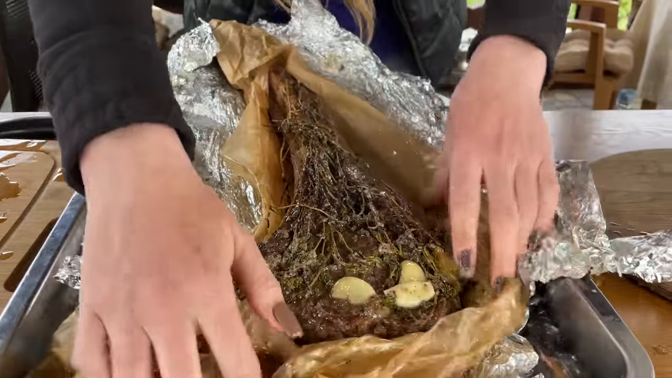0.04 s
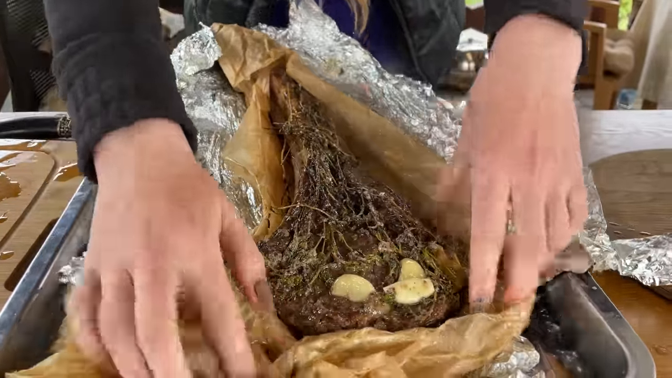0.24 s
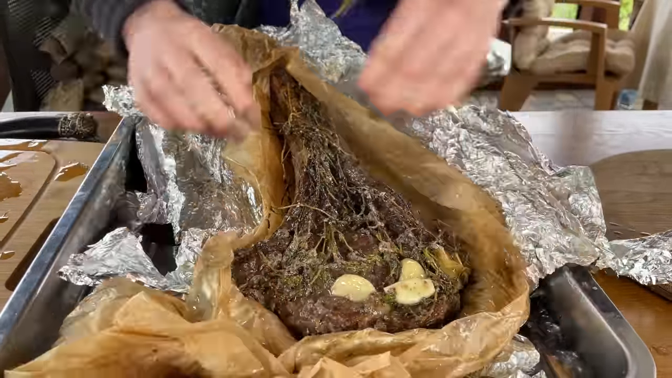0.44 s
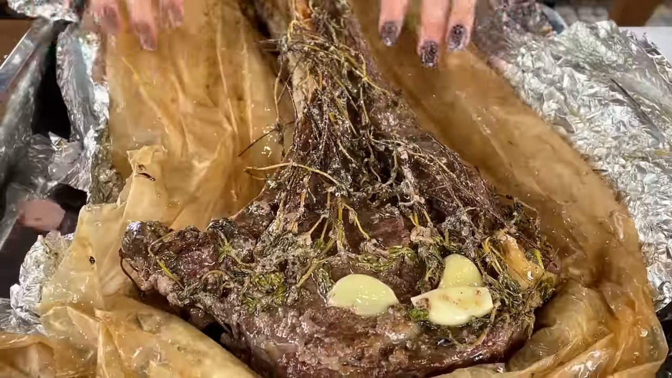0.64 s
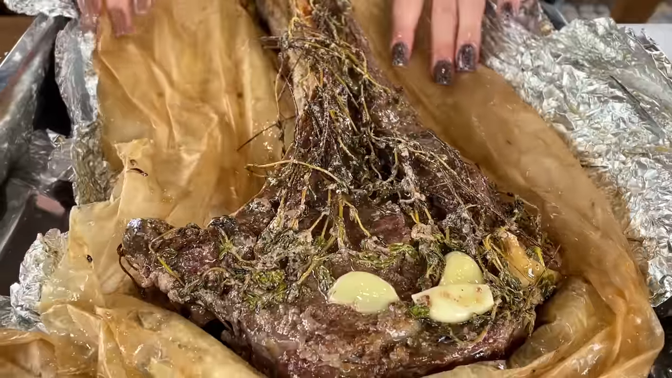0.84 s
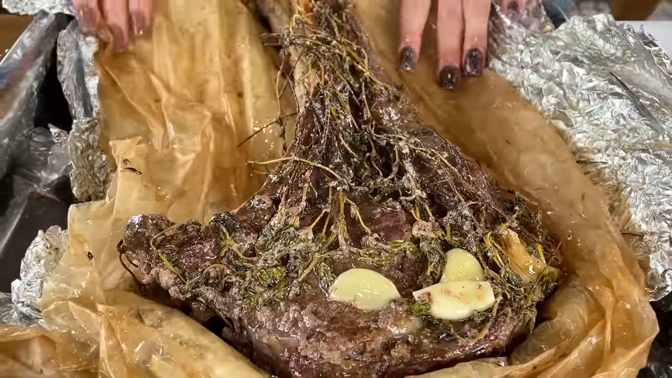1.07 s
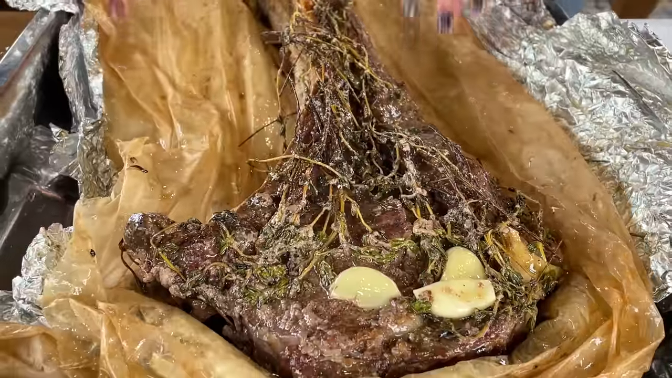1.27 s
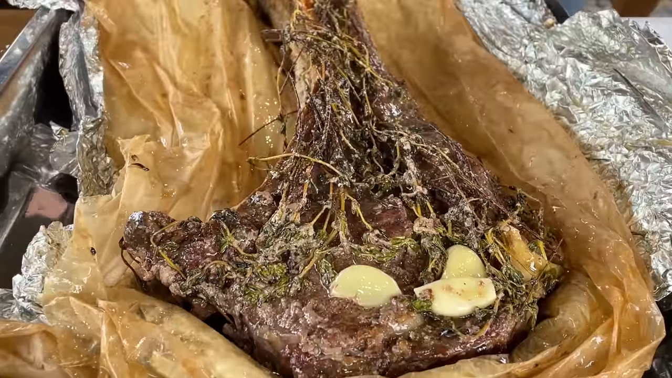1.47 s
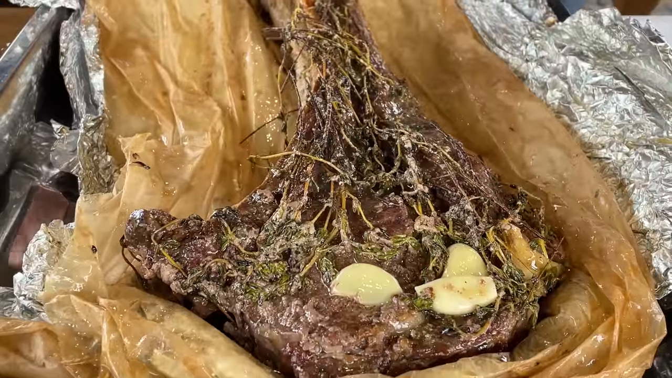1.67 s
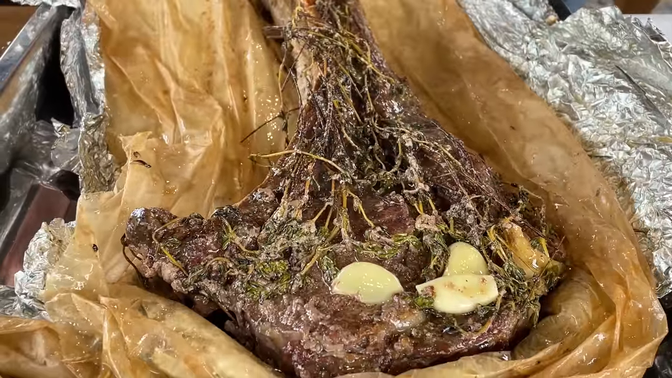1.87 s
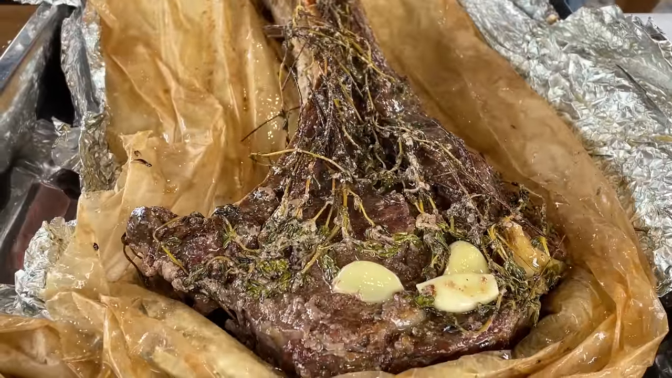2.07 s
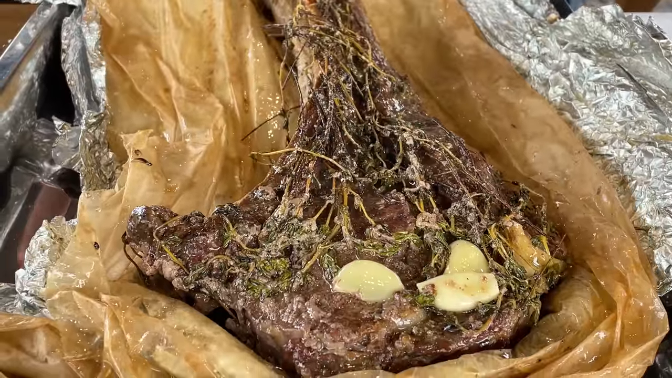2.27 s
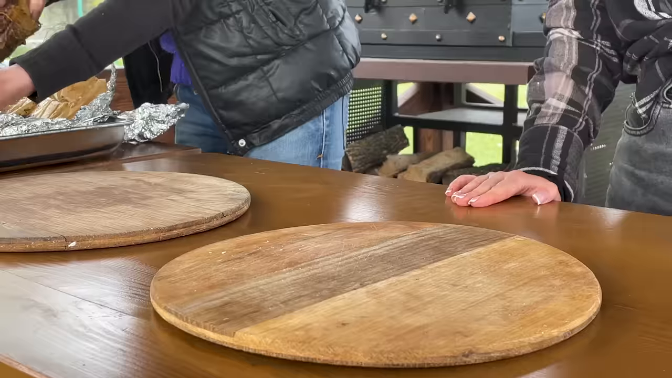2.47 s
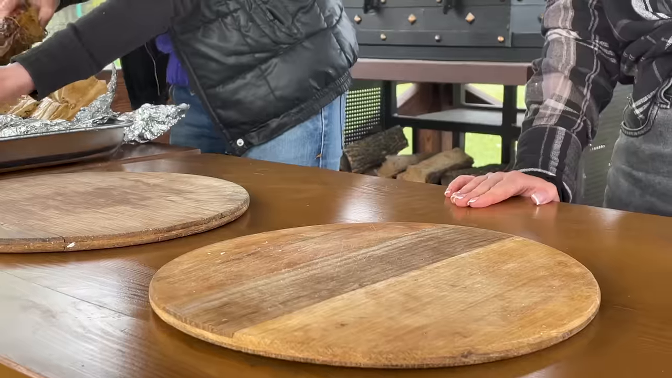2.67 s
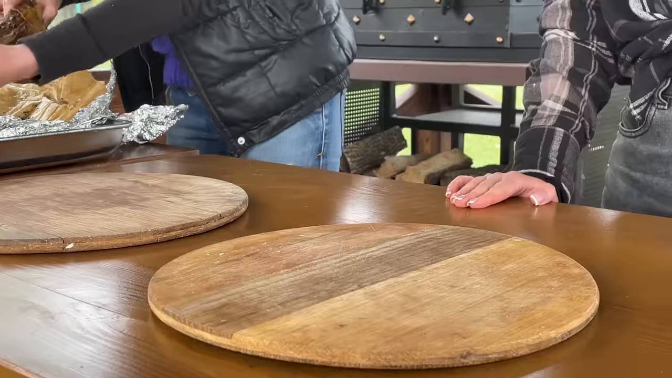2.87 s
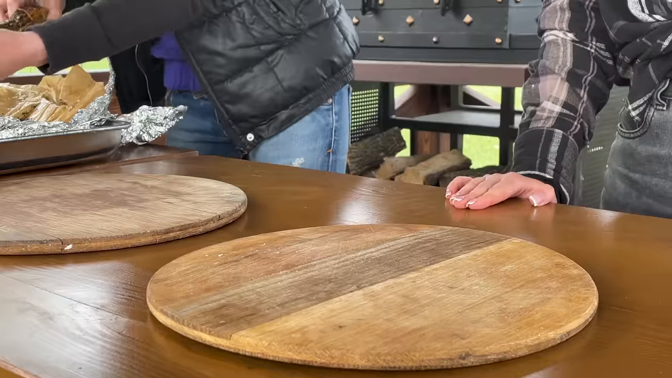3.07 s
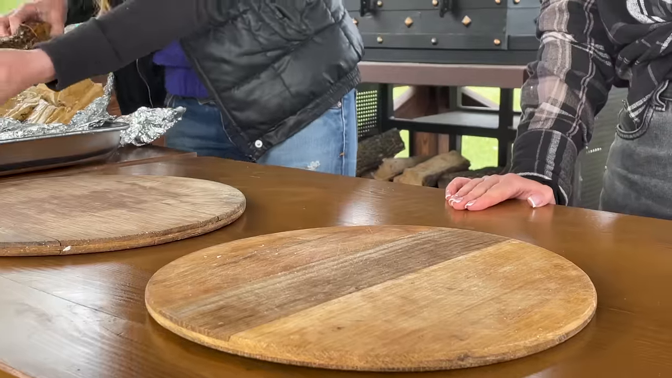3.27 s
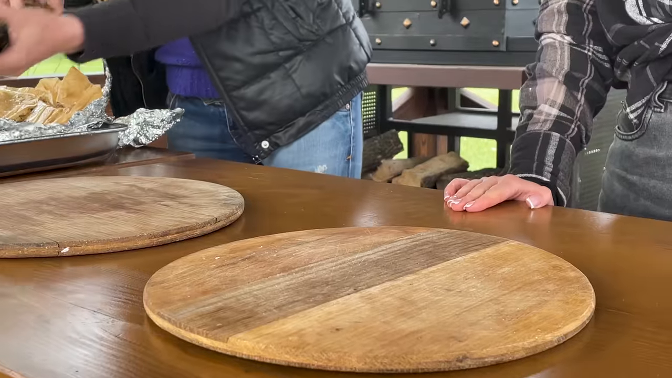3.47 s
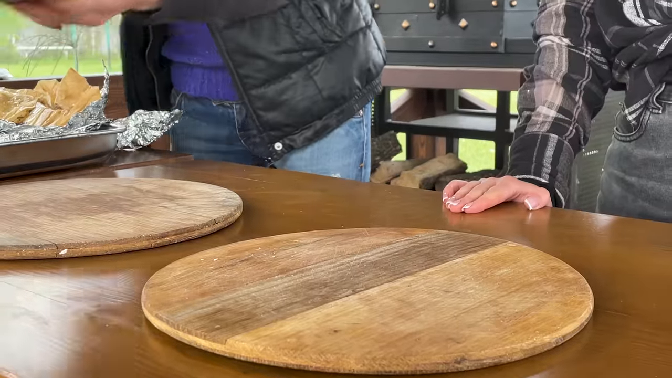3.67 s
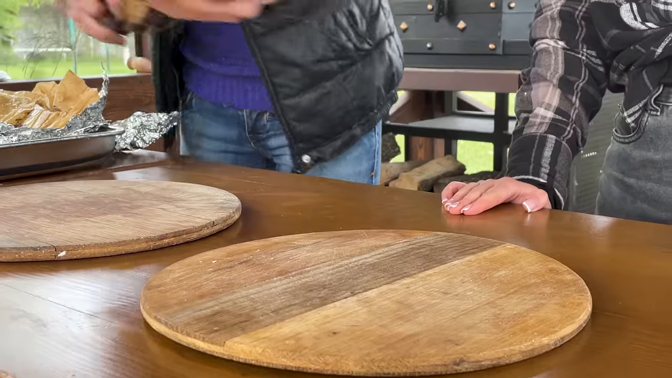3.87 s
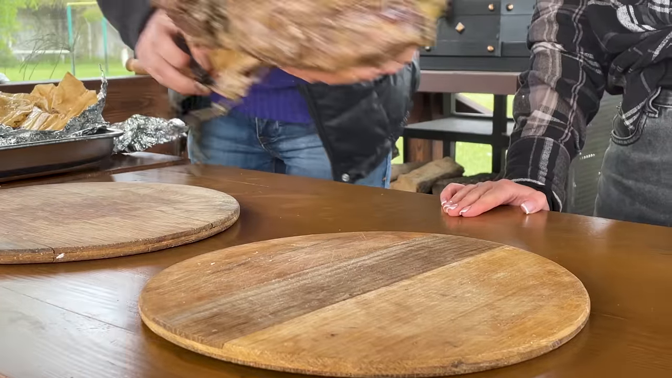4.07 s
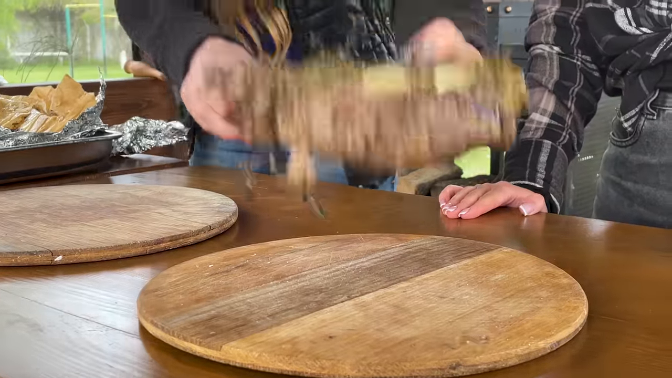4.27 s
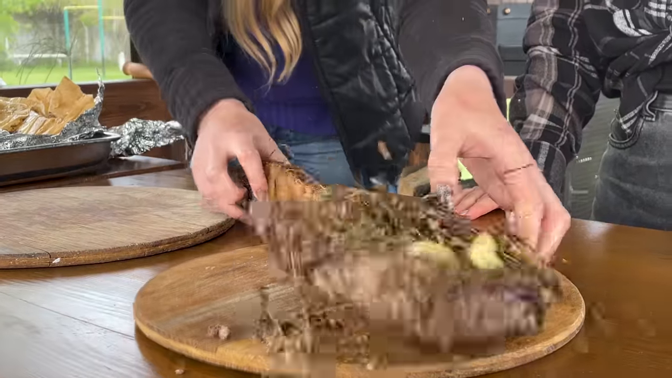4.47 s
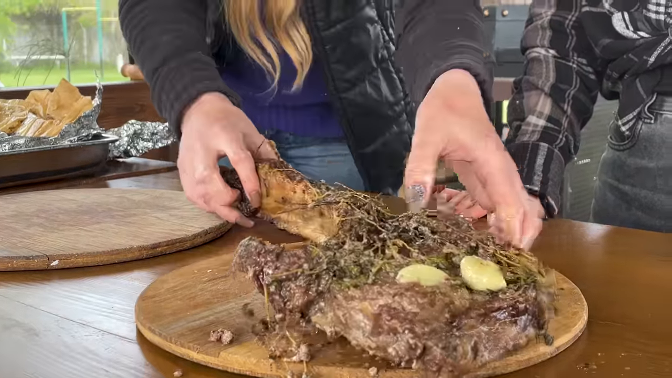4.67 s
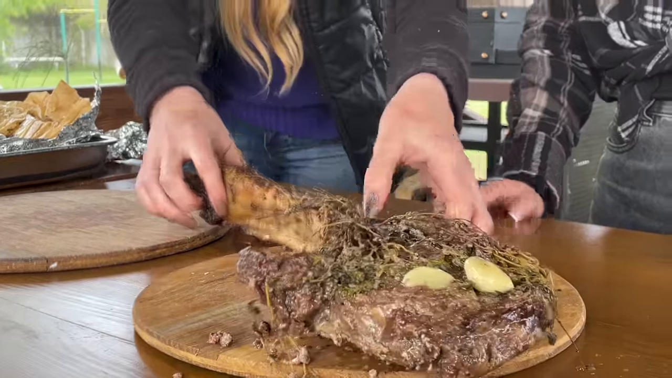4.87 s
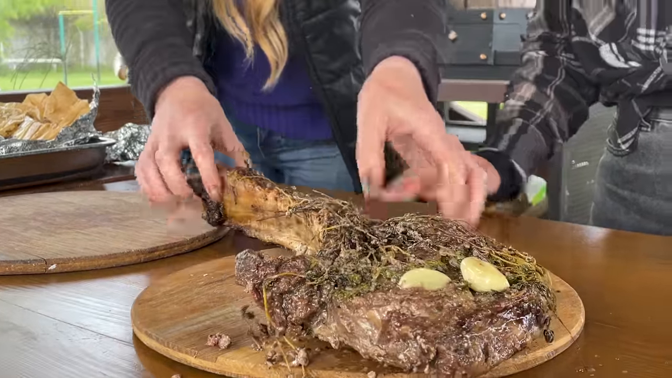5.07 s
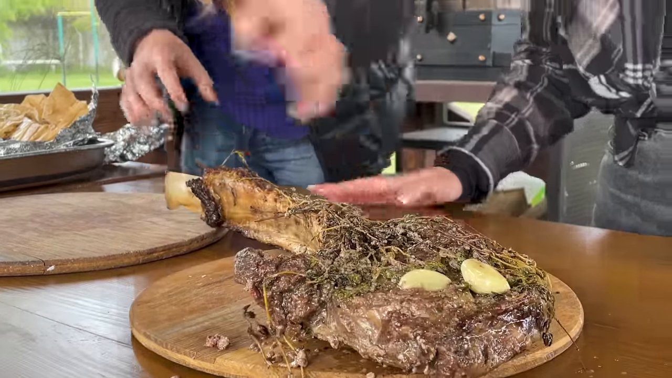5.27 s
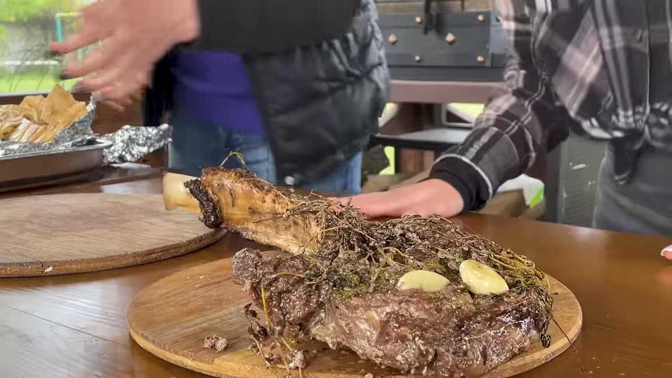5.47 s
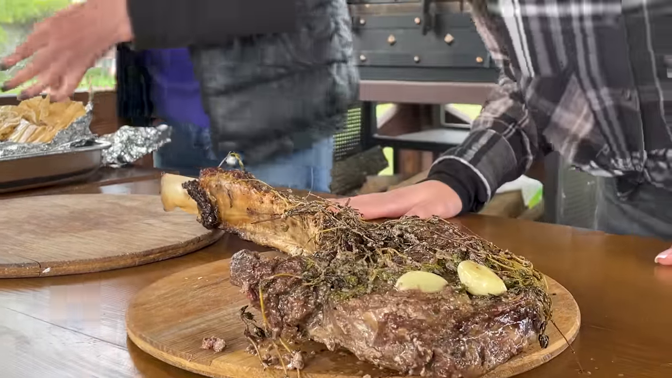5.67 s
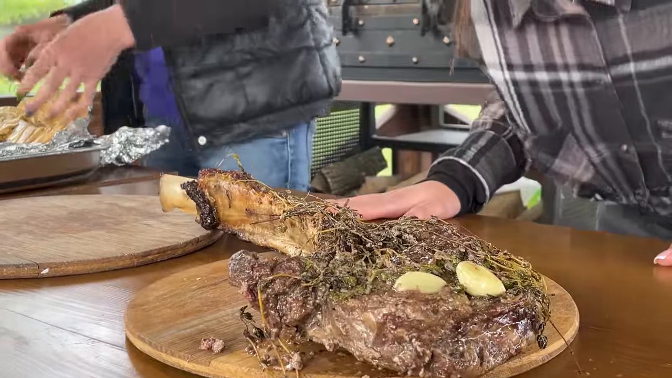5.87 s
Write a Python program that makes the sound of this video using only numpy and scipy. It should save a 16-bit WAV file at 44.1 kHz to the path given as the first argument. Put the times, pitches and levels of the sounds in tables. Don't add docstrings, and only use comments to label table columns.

```python
import sys
import numpy as np
from scipy import signal
from scipy.fft import rfft, irfft
from scipy.io import wavfile

SR = 44100
rng = np.random.default_rng(int(sys.argv[2]) if len(sys.argv) > 2 else 0)


def inscribe(sig):
    pcm = np.round(np.clip(np.atleast_2d(sig).T, -1, 1) * 32767)
    wavfile.write(sys.argv[1], SR, pcm.astype(np.int16))


def level_to_linear(level):
    exponent = np.asarray(level, float) / 20
    return 10 ** exponent


N = 261513
SCENE_CHANGE_S, GAP_S = 2.501, 0.0215

# frequency in Hz, level in dB per Hz.
AIR_SPECTRUM = [(59, -20.5), (100, -14), (163, -1.5), (185, -6.5), (288, -10.5), (748, -14.5),
                (1570, -18.5), (3660, -23), (15800, -29)]
# time in seconds, gain in dB.
RECORDER_GAIN = [(0.0, 3), (.5, -2.5), (1.2, 1), (2.5, -2.5), (3.5, 0.5), (4.1, -0.8), (4.2, -6.5),
                 (4.45, -2), (4.55, 4), (4.72, -3), (4.82, -2), (4.97, 2), (5.1, 2), (5.93, 1)]
# time in seconds, level in dB.
WIND_GUSTS = [(0.0, -3), (.4, -0.5), (.8, 0.5), (1.2, 0), (2.06, 0), (2.3, 4.5), (2.9, 3), (3.3, 3),
              (3.9, 3.5), (4.15, 0), (4.6, -4), (5.1, 3.5), (5.5, 0), (5.93, -.6)]
# peak in seconds, level in dB, rise, fall, hold in seconds.
FAT_SIZZLE = (2.3, -84, 1, .5, .15)
# peak in seconds, level in dB, rise, fall in seconds, favoured pitch in Hz.
NEAR_PULLS = [(.005, -48.5, 0.079, 0.18, 4040), (.09, -55.5, 0.18, .15, 3700),
              (.15, -53.5, 0.081, .15, 4330), (.21, -53, .1, 0.14, 4170), (.28, -52, 0.085, 0.089, 4020),
              (.335, -48.5, 0.056, 0.051, 3850), (.375, -50.5, 0.2, 0.04, 5500),
              (.45, -68.5, 0.073, 0.14, 3200), (.55, -67.5, .08, 0.022, 3400), (.68, -73, .2, 0.068, 3500),
              (.81, -60.5, .08, .1, 3970), (.885, -57.5, 0.092, 0.13, 4800), (.955, -54, 0.16, 0.16, 5300),
              (1.09, -58, .05, 0.066, 3900), (1.139, -54, 0.059, 0.072, 3100),
              (1.275, -61, 0.048, 0.095, 5600), (1.347, -54, 0.11, 0.057, 7000),
              (1.45, -75, 0.069, 0.23, 5500)]
# peak in seconds, level in dB, rise, fall in seconds, favoured pitch in Hz.
DULL_MOVES = [(1.575, -65.5, 0.066, 0.11, 2360), (2.57, -63, 0.094, .1, 2090),
              (2.625, -56, 0.037, 0.18, 2050), (2.705, -57.5, 0.13, 0.07, 2500),
              (2.79, -56.5, 0.056, 0.13, 2100), (3.22, -80, .04, .08, 4000), (3.37, -54.5, 0.065, .2, 1710),
              (3.515, -59, 0.044, 0.11, 2980), (4.05, -73, 0.04, 0.22, 9000),
              (4.195, -69.5, 0.034, 0.11, 6670), (4.33, -69, .04, 0.13, 5510),
              (5.26, -68.5, 0.13, 0.29, 4220), (5.487, -58.5, .015, 0.056, 3820), (5.54, -68, .05, .1, 2800),
              (5.84, -66, 0.17, 0.11, 2900), (5.93, -70, 0.045, .05, 2600)]
# start in seconds, peak in dB, centre in Hz.
NEAR_SNAPS = [(0.0977, -44, 3350), (0.1868, -44, 5120), (0.2029, -33.5, 5000), (0.2548, -36, 4400),
              (0.2768, -31, 4200), (0.3085, -25, 5400), (0.3306, -34.5, 1860), (0.387, -32.5, 6340),
              (0.5434, -51, 5500), (0.7662, -52.5, 2290), (0.7975, -44, 3800), (0.8775, -48, 4160),
              (0.8925, -32, 5500), (0.9154, -46, 6200), (0.9408, -38, 4130), (0.952, -33, 6800),
              (0.971, -40, 5400), (1.0834, -41.5, 3980), (1.1073, -42, 6220), (1.1328, -35.5, 2800),
              (1.2545, -52, 6350), (1.2716, -42, 7000), (1.305, -44, 3460), (.1396, -39, 9500),
              (.1925, -40, 6720), (.7842, -48, 5300), (.8566, -48, 2540), (1.3339, -39, 7000),
              (1.3524, -34, 6900)]
# start in seconds, peak in dB, centre in Hz.
FAR_SNAPS = [(2.6194, -45.5, 2200), (2.6895, -51, 2030), (2.7815, -41.5, 1840), (3.3488, -53, 5210),
             (4.1858, -40, 6570), (4.3153, -58, 4900), (5.1444, -56, 6480), (5.2003, -62, 4640),
             (5.2719, -49.5, 4060), (5.4904, -45, 3900), (5.539, -67, 3280), (5.8046, -61, 3630),
             (5.8345, -53, 4320)]
# start in seconds, peak in dB, centre in Hz.
NEAR_TICKS = [(0.0932, -36, 12500), (0.1231, -52, 8510), (0.1452, -33, 11500), (0.17, -35, 12000),
              (0.193, -50, 9000), (0.204, -36, 9260), (0.2543, -43, 7660), (0.2763, -48, 8160),
              (0.3096, -43, 10000), (0.433, -51, 9000), (0.459, -56, 9000), (0.7662, -46.5, 9050),
              (0.7971, -44, 9840), (0.835, -48, 10200), (0.856, -48, 12000), (0.8744, -47, 7820),
              (0.8919, -54, 10000), (0.9438, -39, 11000), (0.9695, -34, 9300), (1.0806, -42, 8330),
              (1.1074, -43, 10200), (1.1318, -34, 9520), (1.152, -42, 8000), (1.2545, -44, 10700),
              (1.272, -47, 10000), (1.3314, -42.5, 8000), (.158, -40, 6500), (.181, -44, 9000),
              (.208, -42, 11000), (.387, -40, 12000), (1.006, -45, 9000), (1.025, -48, 12500),
              (1.075, -48, 6000), (1.246, -51, 9500)]
# start in seconds, peak in dB, centre in Hz.
FAR_TICKS = [(2.617, -49, 7000), (2.7816, -44.5, 9100), (2.826, -47.5, 10000), (3.215, -58, 9000),
             (3.493, -47, 8140), (4.154, -55.5, 11000), (4.186, -45, 8300), (4.266, -60, 7980),
             (4.314, -52.5, 8560), (4.629, -49.5, 12300), (4.664, -58, 8370), (5.048, -58, 8500),
             (2.572, -58, 7500), (3.222, -60, 10500), (3.3146, -56, 6500), (3.432, -52, 12000),
             (3.545, -56, 3500), (3.597, -60, 9000), (4.0402, -59, 3700), (4.047, -57, 12000),
             (4.062, -58, 10500), (4.072, -61, 9000), (4.102, -58, 13000), (4.111, -60, 6000),
             (4.13, -60, 12000), (4.147, -59, 8000), (4.293, -62, 6000), (4.31, -55, 11000),
             (4.4154, -60, 11000), (4.4463, -63, 7000)]
# start in seconds, peak in dB, centre in Hz, length in ms.
HAND_BUMPS = [
    (0.077, -42, 415, 8),
    (0.217, -42, 1250, 22),
    (0.33, -36, 1020, 11),
    (0.955, -47.5, 570, 61),
    (1.133, -49.5, 456, 11),
    (2.552, -58, 700, 10),
    (2.563, -49.5, 780, 38),
]
# start in seconds, peak in dB, centre in Hz, length in ms.
TABLE_THUMPS = [
    (.078, -49.5, 159, 23),
    (.328, -45, 103, 37),
    (1.335, -57, 250, 50),
]
# start in seconds, peak in dB, centre in Hz, length in ms, width in octaves.
FOLD_CRUMPLES = [(1.333, -38, 7100, 24, 0.43), (1.355, -36, 7000, 22, 0.2), (2.612, -49, 2100, 92, 0.3),
                 (2.772, -48, 2150, 70, 0.28), (5.192, -57, 4330, 61, 0.18), (5.24, -55.5, 4250, 92, 0.19),
                 (5.817, -65.5, 2200, 24, 0.076), (4.201, -51, 8500, 8.8, 0.44),
                 (4.326, -52, 5800, 12.0, 0.77), (4.345, -59, 5450, 13, 0.75), (3.211, -64, 10800, 16, .08),
                 (.283, -45, 8200, 18, .06), (2.694, -52, 5100, 40, .25), (2.69, -52, 2270, 50, 0.19),
                 (.893, -40, 5000, 14, .7), (.94, -41, 5000, 30, .6), (.97, -39, 8500, 14, .5),
                 (1.133, -39, 3200, 14, .8), (1.272, -45, 9000, 10, .5), (1.348, -37, 7500, 20, .35),
                 (.345, -41, 11500, 70, .25), (3.5, -49.5, 7700, 26, 0.25)]
# start in seconds, peak in dB, centre in Hz, length in ms, width in octaves.
FAINT_RUBS = [
    (4.35, -69, 4750, 220, .07),
    (4.415, -66, 4600, 40, .08),
    (4.76, -70, 1850, 150, .15),
    (4.85, -68, 1850, 200, .15),
]
# start, end in seconds, frequency in Hz, level in dB.
SINGING_MODES = [
    (2.8, 3.113, 482, -73.5),
    (3.14, 3.3, 474, -75.5),
    (3.6, 3.85, 470, -80.5),
    (4.15, 4.454, 737, -86),
    (4.15, 4.4, 870, -87),
    (4.8, 4.997, 488, -78.5),
    (3.2, 3.45, 3040, -84.5),
]
# frequency in Hz, level in dB, t60 in
# seconds.
TRAY_MODES = [(169.5, -23, 0.5), (236, -9.5, 0.15), (257, -22, 0.23), (327, -9.5, 0.14), (370, -9.5, 0.14),
              (407, -7.5, 0.084), (650, -14, 0.074), (690, -3, 0.09), (967, -14, 0.33), (780, -14, .05),
              (1095, -14, 0.073), (1148, -12, 0.052), (1450, -19, 0.03), (1613, -14.5, 0.035),
              (1810, -19.5, 0.038),
              (2560, -30, 0.087), (3647, -33, 0.06), (4300, -23.5, 0.064), (4580, -27, 0.08),
             (5280, -25, 0.036), (6000, -25, .03), (7300, -25, 0.025), (8160, -26, 0.025),
             (9260, -24.5, 0.028)]
# start in seconds, level in dB, contact in ms.
DRAG_JOLT = (3.3425, -39, 2.0)
# start in seconds, peak in dB, centre in Hz, length in ms, width in octaves.
ROAST_LANDING = [
    (4.4785, -17, 5500, 15.7, 1.14),
    (4.4835, -10, 2900, 2.2, 0.7),
    (4.479, -24, 1460, 9, .8),
    (4.486, -22.5, 700, 16, 0.7),
    (4.489, -29, 118, 51, 1.43),
    (4.495, -29, 4000, 3.7, 2.1),
    (4.539, -29, 900, 4, 1),
]
# start in
# seconds, peak in dB, centre in Hz, length in ms, width in octaves.
LATE_BOUNCES = [(4.511, -29, 1400, 5, .6), (4.5235, -32, 4000, 3, .4), (4.5245, -23.5, 1770, 5.7, 0.25),
                (4.539, -29, 1750, 5, .35), (4.552, -32.5, 1900, 5, .25),
                (4.561, -36.5, 1800, 4.5, 0.27), (4.564, -43, 6500, 4, .1), (4.6664, -49, 1970, 5.4, .5),
                (5.001, -32, 1300, 8, .5), (5.015, -31, 800, 9, .6), (5.022, -34, 1000, 10, .5),
                (5.041, -35, 1100, 9, .6), (5.062, -41, 1100, 24, .35), (5.116, -49, 720, 14, .2),
                (5.145, -53, 1180, 16, .25)]
# start in seconds, peak in dB, centre in Hz, length in ms, width in octaves.
BONE_KNOCK = [
    (4.9715, -51.5, 2000, 3.4, 0.56),
    (4.9855, -49, 6500, 5, 0.5),
    (4.986, -43.5, 800, 12, 0.56),
    (4.9955, -34, 1900, 10.6, 0.71),
    (4.996, -27.5, 640, 12, 1.05),
    (5.008, -27.5, 700, 14, 0.9),
]
# frequency in Hz, level in dB, t60 in seconds.
SLAPPED_MODES = [(70, -15.5, 0.1), (131, -2, 0.25), (177, -9, 0.46), (261, -14, 0.3), (404.4, -7, .15),
                 (524.6, -6, 0.18), (745, -8, 0.18), (1162, -12, .15)]
# frequency in Hz, level in dB, t60 in seconds.
KNOCKED_MODES = [(96, -38, 0.27), (130, -10.5, 0.31), (181, -5, .3), (237, 2, 0.18), (256.4, -1, 0.25),
                 (377, -8.5, 0.096), (607, -6.5, 0.072), (1270, -23, .08)]
# frequency in Hz, t60 in seconds.
ROOF_DECAY = [(100, 0.56), (300, 0.44), (800, 0.39), (2000, 0.38), (5000, 0.26), (12000, 0.21)]
# start, end in seconds, top of band in Hz.
DULL_STRETCHES = [
    (4.165, 4.184, 13000),
    (4.215, 4.308, 13200),
    (4.345, 4.47, 13700),
    (4.5, 4.585, 15000),
    (4.685, 4.83, 13000),
    (4.83, 4.9, 14800),
]


def rms_one(x):
    return x / np.sqrt(np.mean(x ** 2) + 1e-20)


def band(x, low_hz, high_hz, order=2):
    edges_hz = [low_hz, min(high_hz, 0.45 * SR)]
    return signal.sosfilt(signal.butter(order, edges_hz, "band", fs=SR, output="sos"), x)


def low_pass(x, hz):
    return signal.lfilter(*signal.butter(1, hz, fs=SR), x)


def level_curve(rows):
    s, db = np.transpose(rows)
    t = np.arange(N) / SR
    return np.where((t < s[0]) | (t > s[-1]), -130, np.interp(t, s, db))


def at_hz(points, hz):
    points_hz, values = np.transpose(points)
    return np.interp(np.log(hz), np.log(points_hz), values)


def colour(x, spectrum):
    size = 8192
    hz = np.maximum(np.arange(size // 2 + 1) * SR / size, 1)
    cepstrum = irfft(np.log(level_to_linear(at_hz(spectrum, hz))))
    cepstrum[1:size // 2] *= 2
    cepstrum[size // 2 + 1:] = 0
    shape = irfft(np.exp(rfft(cepstrum)))
    return signal.fftconvolve(x, shape / np.sqrt(np.sum(shape ** 2)))[:N]


def drift(rate_hz):
    r = np.exp(-2 * np.pi * rate_hz / SR)
    slow = signal.lfilter([1], [1, -2 * r, r * r], rng.standard_normal(N + SR))
    return rms_one(slow[SR:])


def ring(drive, hz, t60_s):
    r, w = level_to_linear(-60 / (t60_s * SR)), 2 * np.pi * hz / SR
    return signal.lfilter([0, np.sin(w)], [1, -2 * r * np.cos(w), r * r], drive + 1e-18)


def burst(length_ms):
    noise = rng.standard_normal(4096)
    return noise * level_to_linear(-20 * np.arange(len(noise)) / (length_ms * SR / 1000))


def add(out, s, piece):
    at = round(s * SR)
    out[at:at + len(piece)] += piece[:N - at]


def swell(s, peak_db, rise_s, fall_s, hold_s=0):
    late = np.arange(N) / SR - s
    return peak_db - 20 * np.where(late < 0, -late / rise_s, np.maximum(late - hold_s, 0) / fall_s)


def background():
    gain_db, gust_db = level_curve(RECORDER_GAIN), level_curve(WIND_GUSTS)
    hiss_db, rumble_db, flutter_db = -72, -58.5, -78
    air = band(colour(rng.standard_normal(N), AIR_SPECTRUM), 110, 23000)
    air = air / np.std(band(air, 190, 22000)) * level_to_linear(hiss_db)
    low = low_pass(air, 2800)
    hiss = low * level_to_linear(0.73 * gain_db) + (air - low) * level_to_linear(1.3 * gain_db)
    gusts = rng.standard_normal(N)
    rumble = rms_one(band(gusts, 13.1, 41.4)) * level_to_linear(rumble_db + gain_db + gust_db + 1.8 * drift(22))
    flutter = rms_one(band(gusts, 35, 100)) * level_to_linear(flutter_db + gain_db + 0.4 * gust_db)
    sizzle = rms_one(band(gusts, 11500, 14500)) * level_to_linear(swell(*FAT_SIZZLE))
    sizzle = sizzle * (np.arange(N) < SCENE_CHANGE_S * SR)
    return hiss + sizzle + rumble + flutter


def handling():
    near_body_db, near_bright_db, far_body_db, far_bright_db = -1.5, 4, -6, -0.5
    thinning_db_per_octave, shine_db_per_octave = -2, 2
    near = NEAR_PULLS, near_body_db, near_bright_db
    far = DULL_MOVES, far_body_db, far_bright_db
    total, mixed = 1e-12, np.full((3, N), 1e-12)
    for moves, body_db, bright_db in (near, far):
        for *shape, hz in moves:
            power, octaves = level_to_linear(2 * swell(*shape)), np.log2(hz / 3300)
            body = body_db + thinning_db_per_octave * octaves
            bright = bright_db + shine_db_per_octave * octaves
            total = total + power
            mixed += power * np.c_[[body, bright, hz]]
    return 10 * np.log10(total), *(mixed / total)


def rustle(per_s, spread_db, cycles, clump_db, hump_db):
    level_db, body_db, bright_db, favoured_hz = handling()
    sizes = level_to_linear(spread_db * np.minimum(rng.exponential(1, N), 4)) * rng.choice([-1, 1], N)
    creases = sizes * (rng.random(N) < per_s / SR)
    clumps = [drift(51.5) for _ in range(3)]
    wander = drift(14.0)
    pitches_hz, dealt, out = np.geomspace(350, 14000, 24), rng.integers(0, 24, N), 0
    for k, hz in enumerate(pitches_hz):
        place = np.log(hz / 3300)
        if place < 0:
            tilt_db = np.minimum(body_db, 3.0) * min(-place / 1.38, 1.2)
        else:
            tilt_db = bright_db * place / 0.89
        tilt_db = tilt_db + hump_db * np.exp(-(np.log(hz / favoured_hz) / 0.25) ** 2)
        busy_db = clump_db * (0.2 * clumps[0] + clumps[1 + k // 12])
        busy_db = busy_db + 2.5 * np.roll(wander, k // 2 * SR // 3)
        patch = rms_one(ring(creases * (dealt == k), hz, cycles / hz + 0.0008))
        out = out + patch * level_to_linear(tilt_db + busy_db)
    return band(out, 420, 17000) * level_to_linear(level_db - 14.5)


def snaps(events, octaves=1.0, edge=0.0):
    out = np.zeros(N)
    for s, peak_db, hz, length_ms, *own in events:
        width, noise = own[0] if own else octaves, burst(length_ms)
        noise[0] += edge * np.sign(noise[0])
        piece = band(noise, hz * 2 ** -width, hz * 2 ** width)
        add(out, s, level_to_linear(peak_db) * piece / np.abs(piece).max())
    return out


def lasting(events, length_ms):
    return [(*row, length_ms) for row in events]


def sheet_details():
    creases = lasting(NEAR_SNAPS, 2.5) + lasting(FAR_SNAPS, 4.0)
    out = snaps(creases, octaves=0.72, edge=4.0)
    out = out + snaps(HAND_BUMPS, octaves=0.56)
    out = out + snaps(FOLD_CRUMPLES + FAINT_RUBS)
    out = out + snaps(LATE_BOUNCES, edge=0.6)
    out = out + level_to_linear(-1.0) * snaps(lasting(NEAR_TICKS + FAR_TICKS, 1.9), octaves=0.37, edge=1.4)
    return out + snaps(TABLE_THUMPS, octaves=0.62)


def room(x, onset_ms):
    t = np.arange(SR // 2) / SR
    noise = rfft(rng.standard_normal(len(t)))
    octave = np.log2(np.maximum(np.arange(len(t) // 2 + 1) * 2, 1) / 40)
    tail = 1e-18
    for k in range(10):
        share = np.clip(1 - np.abs(octave - k), 0, 1)
        tail = tail + irfft(noise * share) * level_to_linear(-60 * t / at_hz(ROOF_DECAY, 40 * 2 ** k))
    tail = tail * (1 - np.exp(-t * 1000 / onset_ms))
    return signal.fftconvolve(x, tail / np.sqrt(np.sum(tail ** 2)))[:N]


def singing():
    out = np.zeros(N)
    for start, end, hz, level_db in SINGING_MODES:
        size = round((end - start) * SR)
        wobble_rad = np.cumsum(rng.standard_normal(SR))[:size] * 0.005
        tone = np.sin(2 * np.pi * hz * np.arange(size) / SR + wobble_rad)
        add(out, start, level_to_linear(level_db) * np.sqrt(2 * np.hanning(size)) * tone)
    return out


def tray():
    drag_s, touch_s, thin_lag_s = 3.35, 3.321, 0.011
    low_db = swell(drag_s, -33, rise_s=0.039, fall_s=0.09)
    high_db = swell(drag_s + thin_lag_s, -39.5, rise_s=0.029, fall_s=0.07, hold_s=0.062)
    friction = rng.standard_normal(N) * level_to_linear(1.6 * drift(57)) * (np.arange(N) > touch_s * SR)
    low, high = friction * level_to_linear(low_db), friction * level_to_linear(high_db)
    s, jolt_db, contact_ms = DRAG_JOLT
    add(low, s, level_to_linear(jolt_db) * np.hanning(round(contact_ms * SR / 1000)))
    out = np.zeros(N)
    for hz, level_db, t60_s in TRAY_MODES:
        out += ring(low if hz < 500 else high, hz, t60_s) * level_to_linear(level_db - 28)
    return out


def board(blows, modes, modes_db, wet_db, dull_hz, rock_s, rock_db):
    contact, pushes = snaps(blows, edge=0.56), np.zeros(N)
    for s, peak_db, hz, length_ms, width in blows:
        push = level_to_linear([peak_db]) * min(1000 / hz, 1) ** 2
        add(pushes, s, push)
        add(pushes, s + rock_s, push * level_to_linear(rock_db))
    body = np.zeros(N)
    for k, (hz, level_db, t60_s) in enumerate(modes):
        sign = (-1) ** (k // 2)
        body += sign * ring(pushes, hz, t60_s) * level_to_linear(level_db + modes_db)
    return contact + body + level_to_linear(wet_db) * room(low_pass(contact, dull_hz), onset_ms=1.8)


def scene():
    air = background() + singing()
    sheets = rustle(per_s=14000, spread_db=2.8, cycles=5.5, clump_db=1.1, hump_db=4.0)
    sheets = sheets + sheet_details()
    metal = tray()
    slap = board(ROAST_LANDING, SLAPPED_MODES, modes_db=-12, wet_db=-3.5, dull_hz=5000,
                 rock_s=0.05, rock_db=-9.0)
    knock = board(BONE_KNOCK, KNOCKED_MODES, modes_db=-12.5, wet_db=-6.0, dull_hz=5000,
                  rock_s=0.038, rock_db=-2.5)
    reflections = room(level_to_linear(-10.0) * sheets + level_to_linear(-9.5) * metal, onset_ms=0.93)
    near = sheets + metal + slap + knock + reflections
    near = signal.sosfilt(signal.cheby2(8, 40, 15700, fs=SR, output="sos"), near)
    return (near + air)[None]


def top_cut(x):
    return signal.sosfilt(signal.butter(12, 16000, fs=SR, output="sos"), x)


def record(dry):
    t = np.arange(N) / SR
    gap_end_s = SCENE_CHANGE_S + GAP_S
    gap_db = np.interp(t, [SCENE_CHANGE_S, gap_end_s], [-8.0, -24.0])
    gap = np.where((t > SCENE_CHANGE_S) & (t < gap_end_s), level_to_linear(gap_db), 1)
    hz = np.arange(N // 2 + 1) * SR / N
    spectrum = rfft(dry * gap) * (hz < 16000)
    out = irfft(spectrum, N)
    for start, end, top_hz in DULL_STRETCHES:
        during = np.clip(np.minimum(t - start, end - t) / 0.004, 0, 1)
        above = np.clip((hz - top_hz + 200) / 400, 0, 1)
        out = out - during * irfft(spectrum * above, N)
    return top_cut(out)


dry = scene()
out = record(dry)
inscribe(out)
```